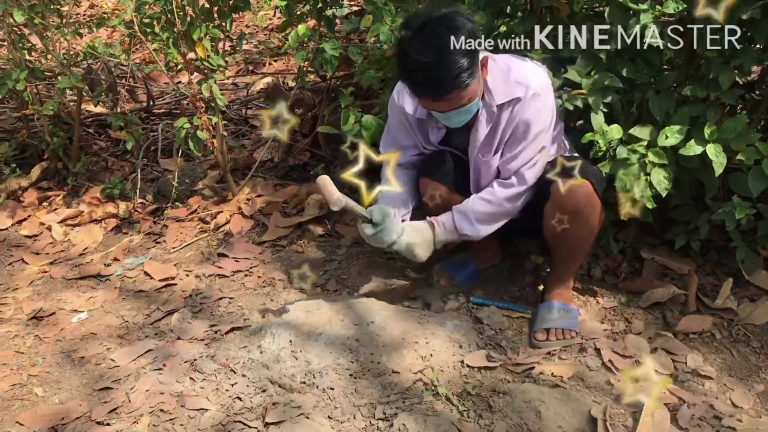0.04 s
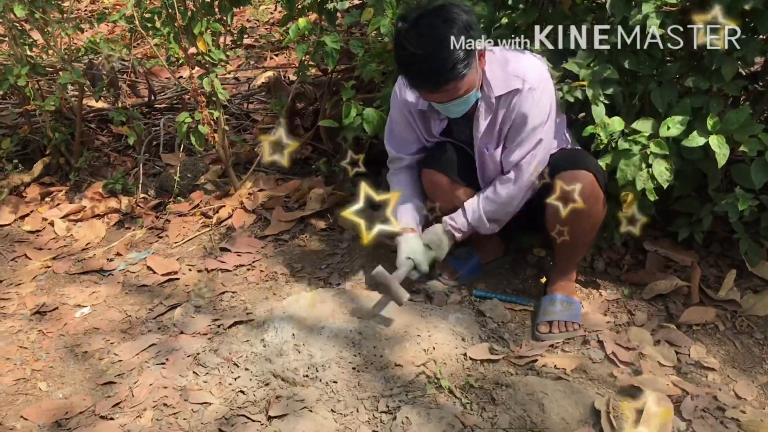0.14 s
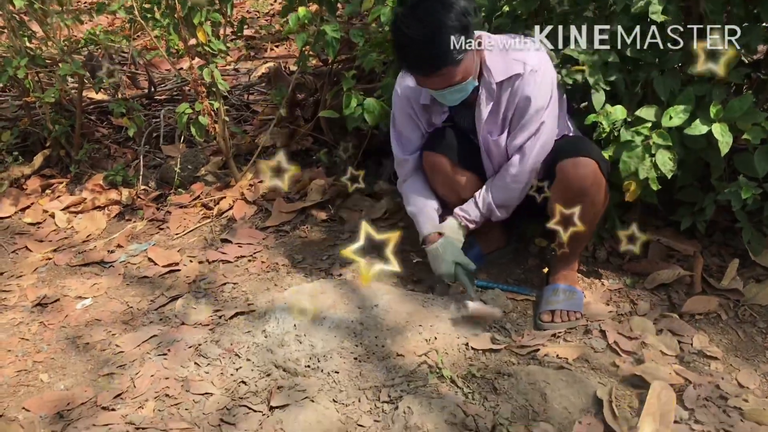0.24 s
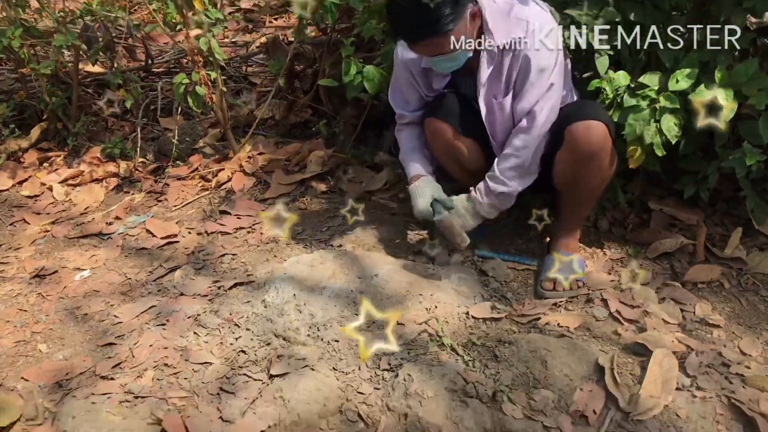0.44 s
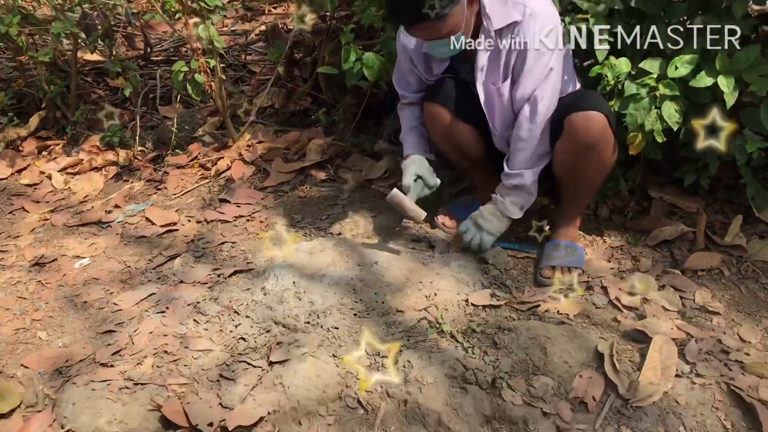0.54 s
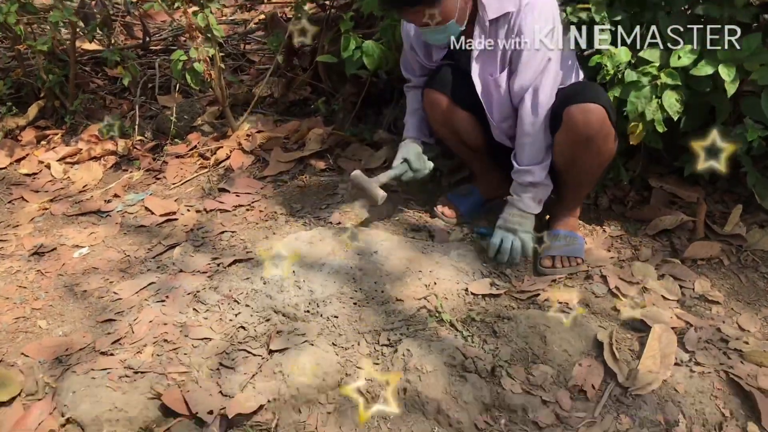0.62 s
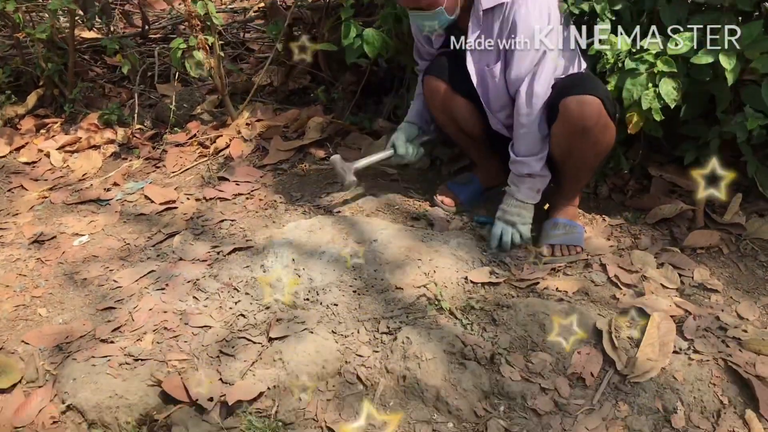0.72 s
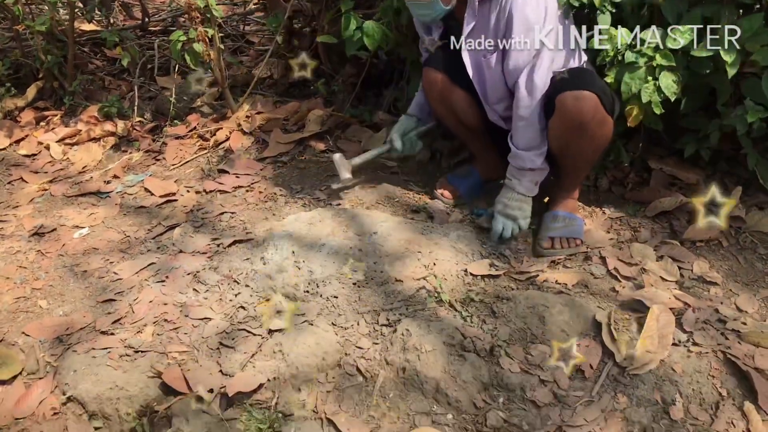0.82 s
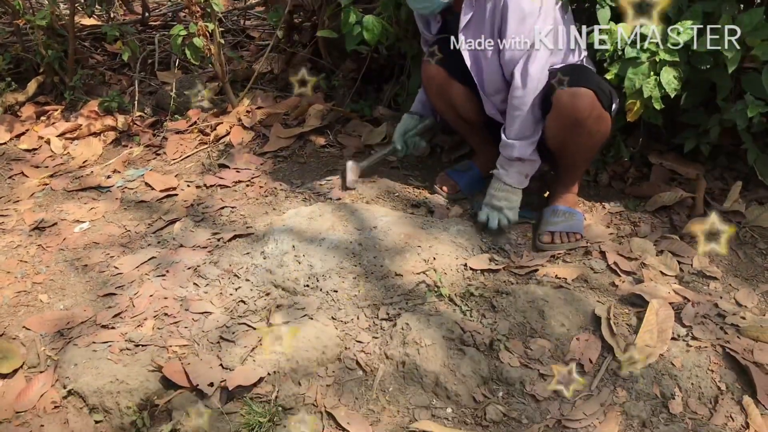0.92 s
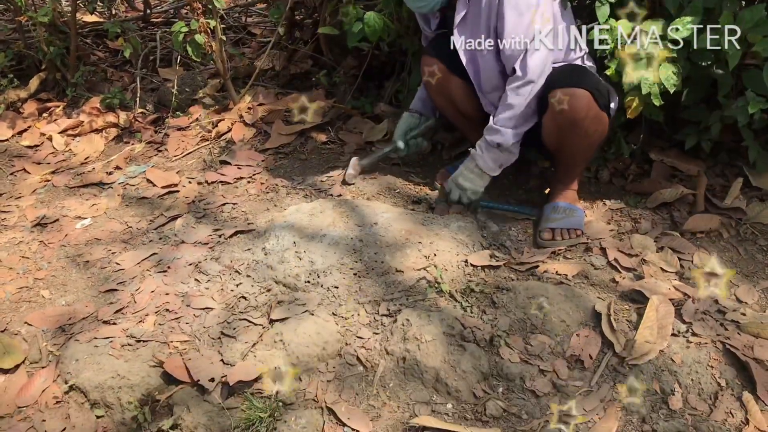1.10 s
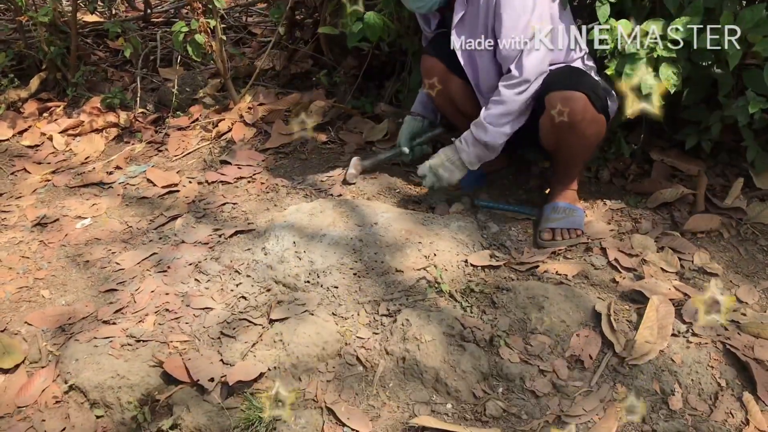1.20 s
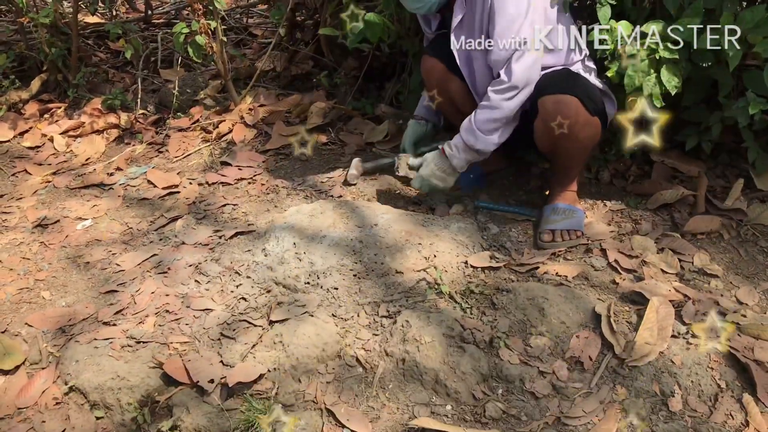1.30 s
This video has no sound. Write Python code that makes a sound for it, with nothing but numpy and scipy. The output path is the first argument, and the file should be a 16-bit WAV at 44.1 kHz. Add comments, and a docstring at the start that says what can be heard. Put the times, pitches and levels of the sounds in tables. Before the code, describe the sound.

A small steel hammer strikes a rock close by at about 0.2 seconds, after a few faint ticks: one sharp, crunching crack with a brief metallic ring. Chips patter into dry leaves until 0.7 seconds. Near 1 second the hammer is set down with a weaker double knock, then glove and tool scrape softly through grit with small clicks until about 1.4 seconds. A faint, low outdoor rumble continues throughout.

```python
"""Outdoors among bushes, one microphone close to a rock, a low rumble underneath throughout.
After a few faint ticks a small steel hammer strikes: a glancing touch, then the full blow, which
crushes stone and rings rock and steel. Chips patter into dry leaves. The hammer is set down on the
stone with a double knock, then a glove and the tool scrape through grit.
Farther off, the bushes scatter a faint tail after each sound."""
import sys
import numpy as np
from scipy import signal
from scipy.fft import rfft, irfft, next_fast_len
from scipy.io import wavfile
from scipy.ndimage import map_coordinates

SR = 44100
rng = np.random.default_rng(int(sys.argv[2]) if len(sys.argv) > 2 else 0)


def to_wav(s):
    """Save 16-bit WAV."""
    ch = np.atleast_2d(s).T  # columns
    pcm = np.round(np.clip(ch, -1, 1) * 32767)  # PCM
    wavfile.write(sys.argv[1], SR, pcm.astype(np.int16))


N = 59535

# modes of the hammer's head and handle: f/Hz, level in a blow/dB, level when set down/dB, t60/s
HAMMER_MODES = [(818, -41, -35, 0.62), (1023, -10, -17.5, 0.07), (2314, -11.5, -27, 0.028),
                (2850, -16, -35, 0.056), (3170, -31, -50, 0.066), (4860, -22.5, -47, 0.11),
                (5245, -26, -45, 0.068), (8190, -30, -47, 0.036), (8670, -34, -56, 0.056),
                (11490, -24, -33, .11), (12350, -38, -44, .11), (12850, -39, -52, 0.029),
                (12700, -12.5, -33, 0.16), (14000, -27, -44, 0.12)]


def amp(db):
    return 10 ** (np.asarray(db) / 20)


def unit(x):
    """Scale to rms 1."""
    return x / np.sqrt(np.mean(x ** 2) + 1e-20)


def filtered(x, response):
    """Filter x by a gain given as a function of f/Hz."""
    size = next_fast_len(N + 8192)
    return irfft(rfft(x, size) * response(np.fft.rfftfreq(size, 1 / SR)), size)[:N]


def coloured(x, spectrum):
    """Shape x by points of f/Hz, level/dB and scale to rms 1."""
    freqs, db = np.transpose(spectrum)
    return unit(filtered(x, lambda hz: amp(np.interp(np.log(hz + 1), np.log(freqs), db))))


def noise(spectrum):
    """Noise of a given colour, at rms 1."""
    return coloured(rng.standard_normal(N), spectrum)


def since(start):
    """Seconds elapsed after start, zero before."""
    return np.maximum(np.arange(N) / SR - start, 0)


def fade(start, t60, attack_s=0.0001):
    """A sudden onset and an exponential decay."""
    t = since(start)
    return (1 - np.exp(-t / attack_s)) * np.exp(-np.log(1000) * t / t60)


def ring(start, hz, t60):
    """One struck, damped mode that builds up over its first cycle."""
    t = since(start)
    return np.sin(2 * np.pi * hz * t) * fade(start, t60) * (1 - np.exp(-2 * hz * t))


def air():
    """The ambience of the place: a steady low rumble and faint hiss."""
    # outdoor background: f/Hz, level/dB
    air_spectrum = [(20, -10.5), (50, -5), (90, 3), (190, -4.5), (280, -6), (390, -12), (520, -18.5),
                    (1200, -18), (4000, -26), (12500, -33.5), (16000, -34)]
    return amp(-43.5) * noise(air_spectrum)


def bushes(near, blur_s=0.0041):
    """The undergrowth scatters the near sounds into a faint tail; leaves blur its phase."""
    # colour of the tail: f/Hz, level/dB
    tail_spectrum = [(100, 12), (700, -17), (2000, 1.5), (2900, -3.5), (5000, -4), (8000, -6.5),
                     (13000, -10)]
    tail = noise(tail_spectrum) * fade(start=0.016, t60=0.44)
    echo = signal.fftconvolve(near, tail / np.linalg.norm(tail))[:N]
    phase_drift = np.cumsum(rng.standard_normal(N)) / np.sqrt(blur_s * SR)
    return amp(-23) * np.real(signal.hilbert(echo) * np.exp(1j * phase_drift))


def scrape(grains_per_s=9000, spread_db=2.5):
    """Dense sand grains slip under glove and tool, each with a tiny click."""
    # course of the stroke: t/s, level/dB
    stroke = [(0.959, -47.5), (1.01, -41), (1.04, -38), (1.11, -37), (1.18, -35.5), (1.223, -37),
              (1.243, -41), (1.31, -51), (1.35, -43)]
    # colour of the grit: f/Hz, level/dB
    grit_spectrum = [(100, 1), (330, 5.5), (520, -9), (900, -4), (1800, -4), (4300, -2.5), (6500, -6.5),
                     (12000, -10.5), (16000, -15.5)]
    slips = rng.random(N) < grains_per_s / SR
    grains = slips * rng.standard_normal(N) * amp(spread_db * rng.standard_normal(N))
    times, db = np.transpose(stroke)
    t = np.arange(N) / SR
    envelope = amp(np.interp(t, times, db)) * (t > times[0])
    return coloured(grains, grit_spectrum) * envelope


def ticks():
    """Stone chips, grit and dry leaves around the rock tick in short, broad bursts of noise."""
    # single ticks: t/s, level/dB, centre f/Hz, half-width/octaves, t60/s
    bursts = [(.0365, -37, 7000, 1.2, 0.0093), (0.0454, -29.5, 5000, 0.76, 0.042),
              (.0858, -36, 4700, 0.79, 0.0075), (.1620, -37, 5300, 0.59, .007),
              (0.1694, -34, 4280, 0.89, 0.0066), (0.278, -41, 4000, 1.5, 0.045),
              (.314, -40, 5500, 0.62, 0.016), (0.35, -32.5, 2600, 0.85, 0.012),
              (.371, -40, 8000, 2.3, 0.0096), (0.4622, -36, 4170, 0.92, 0.034),
              (.484, -39, 2310, 0.88, 0.026), (0.562, -40, 12000, 3.2, 0.012),
              (0.674, -38, 9300, 0.87, 0.013), (1.035, -32, 3850, 0.48, 0.041),
              (1.085, -29, 4360, 0.88, 0.037), (1.086, -28.5, 930, 0.63, 0.036),
              (1.095, -37, 10000, 1, 0.043), (1.1504, -21.5, 1830, 0.37, .013),
              (1.2228, -23.5, 8200, 0.31, 0.011), (1.344, -35, 4500, 3.6, 0.14)]
    out = np.zeros(N)
    for start, db, centre_hz, octaves, t60 in bursts:
        white = rng.standard_normal(N)
        band = filtered(white, lambda hz: 1 / (1 + (np.log2((hz + 1) / centre_hz) / octaves) ** 2))
        out += amp(db) * unit(band) * fade(start, t60)
    return out


def knocks():
    """The hammer is set down and rocks once: two knocks of thud, clack and ring, a faint touch between."""
    # contacts: t/s, ring level/dB, clack level/dB, thud level/dB, thud f/Hz, ring treble loss/(dB/kHz)
    landings = [(0.9600, 1, -24, -15.5, 330, 0.12), (0.985, -19, -38, -25, 347, 1),
                (1.0015, -0.5, -21, -13, 312, 6.5)]
    # clack of steel on stone: f/Hz, level/dB
    clack_spectrum = [(100, -28), (300, -21), (550, -1.5), (900, 13), (1300, -11), (2300, -3), (4000, -34),
                      (9000, -33), (15000, -35)]
    out = np.zeros(N)
    for start, ring_db, clack_db, thud_db, thud_hz, loss_db_per_khz in landings:
        steel = sum(amp(db - loss_db_per_khz * hz / 1000) * ring(start, hz, t60)
                    for hz, _, db, t60 in HAMMER_MODES)
        clack = amp(clack_db) * noise(clack_spectrum) * fade(start, t60=0.035)
        thud = amp(thud_db) * ring(start, thud_hz, t60=0.04)
        out += amp(ring_db) * steel + clack + thud
    return out


def blow(choke_s=0.018):
    """Each contact snaps, crushes stone and rings rock and steel; the next chokes the earlier ring."""
    # contacts of the blow: t/s, snap level/dB, crack level/dB, rock level/dB, steel level/dB
    contacts = [(0.2166, -18, -11, -2, -6), (0.227, 4, -8, -7.5, -2.5), (0.23, -40, -10.5, -2.5, 1)]
    # crack of crushed stone: f/Hz, level/dB
    crack_spectrum = [(150, -17), (300, -4), (500, -25), (950, 6.5), (1900, -10.5), (2450, 0), (4500, -7),
                      (6000, -32), (8200, -12.5), (10000, -31), (16000, -31)]
    # modes of the rock in its bed of soil: f/Hz, level/dB, t60/s
    rock_modes = [(94.3, -13.5, 0.05), (265, -21, 0.058), (695, -20, 0.043), (980, -18.5, 0.012),
                  (1330, -25, 0.02), (2644, -10, 0.015), (3650, -37, 0.011)]
    out = np.zeros(N)
    for start, snap_db, crack_db, rock_db, steel_db in contacts:
        snap = amp(snap_db) * ring(start, hz=4245, t60=0.0034)
        crack = amp(crack_db) * noise(crack_spectrum) * fade(start, t60=0.037)
        rock = sum(amp(db) * ring(start, hz, t60) for hz, db, t60 in rock_modes)
        steel = sum(amp(db) * ring(start, hz, t60) for hz, db, _, t60 in HAMMER_MODES)
        steel *= fade(start, t60=0.096)  # extra damping while the head is driven into the rock
        out *= np.exp(-since(start) / choke_s)
        out += snap + crack + amp(rock_db) * rock + amp(steel_db) * steel
    return out


def radiated(x, corner_hz=54):
    """Small struck bodies radiate little deep bass."""
    return filtered(x, lambda hz: (1j * hz / (corner_hz + 1j * hz)) ** 2)


def scene():
    """At the microphone, in mono: hammer, chips and grit close by, bushes and ambience behind."""
    near = radiated(blow() + knocks()) + ticks() + scrape()
    return (near + bushes(near) + air())[None]


def record(dry):
    """The recorder cuts off steeply above its band limit."""
    top_hz = 16000
    return filtered(dry[0], lambda hz: 1 / np.sqrt(1 + (hz / top_hz) ** 240))[None]


dry = scene()
out = record(dry)
to_wav(out)
```